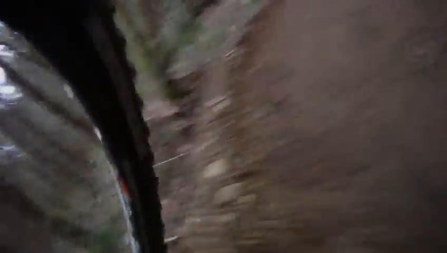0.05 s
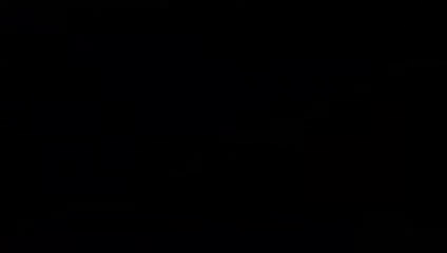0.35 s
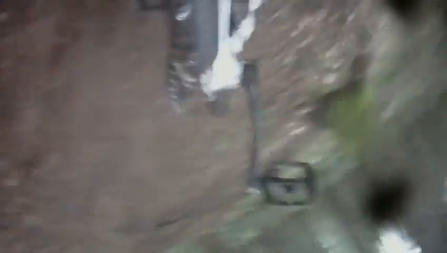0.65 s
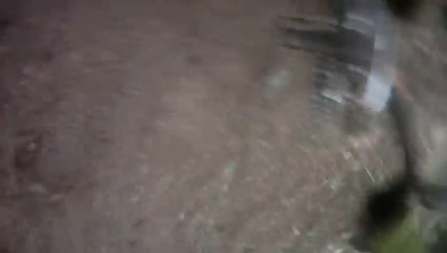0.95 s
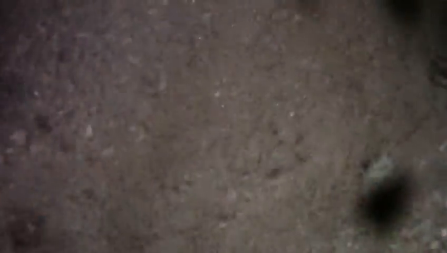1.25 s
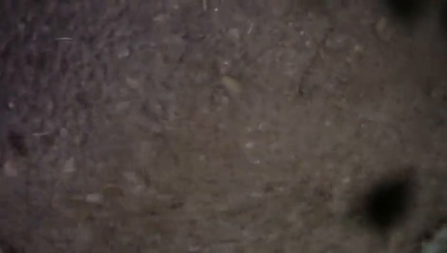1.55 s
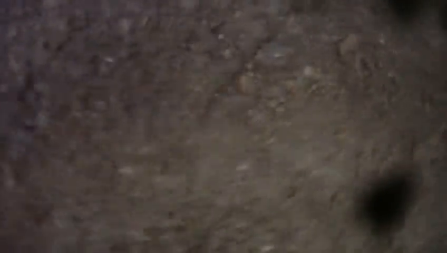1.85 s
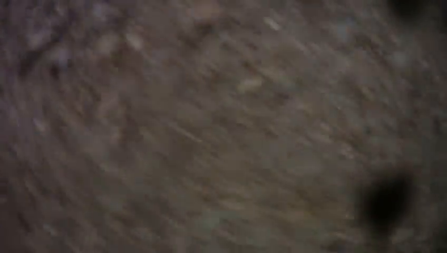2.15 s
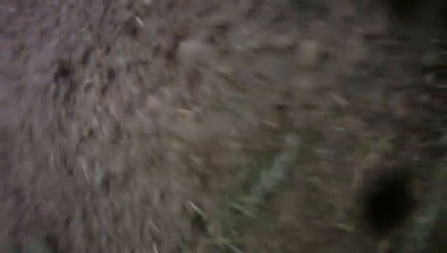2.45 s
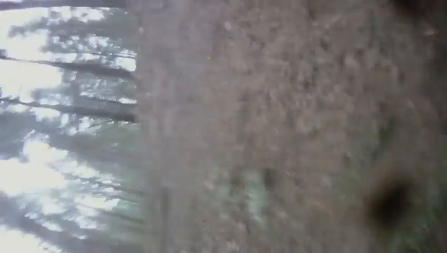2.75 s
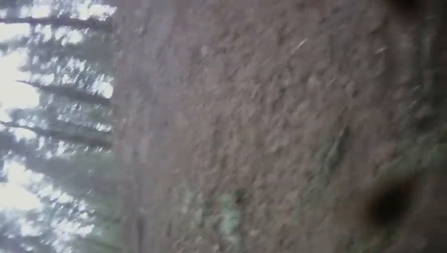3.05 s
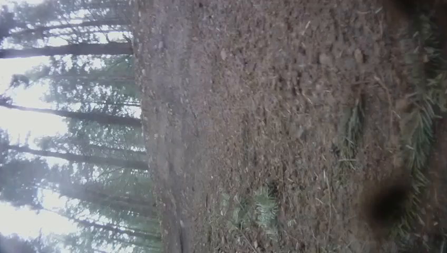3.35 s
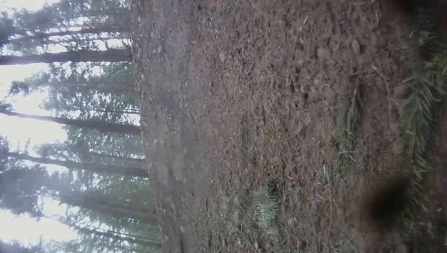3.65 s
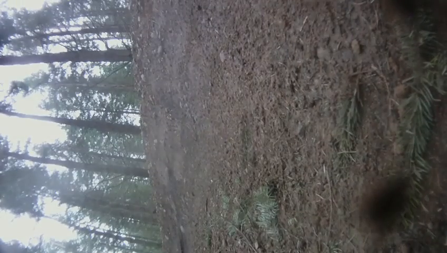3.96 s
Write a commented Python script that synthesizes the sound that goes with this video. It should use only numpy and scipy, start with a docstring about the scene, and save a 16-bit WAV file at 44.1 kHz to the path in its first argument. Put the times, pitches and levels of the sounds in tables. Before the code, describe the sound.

A bike crash, heard from a cased camera worn by the rider: hard, overloading cracks against the ground, then choppy scraping along the forest trail with stone snaps, plastic knocks and a hollow, juddering rumble that settles into faint hiss.

```python
"""Mountain bike crash on a forest trail

Heard from the microphone of a cased camera worn by the rider, with every source right at the case.
The camera hits the ground in a burst of overloading blows, then is dragged over dirt and grit.
Its case clacks, its mount booms and judders, and the jolts choke the microphone.
When all comes to rest, a faint hum of the shell and the camera's own hiss and buzz remain."""
import sys
import numpy as np
from scipy import signal
from scipy.io import wavfile
from scipy.ndimage import uniform_filter1d

SR = 44100
rng = np.random.default_rng(int(sys.argv[2]) if len(sys.argv) > 2 else 0)


def digitize_waveform(pressure):
    """Quantize a signal to 16-bit integers and store it at the path in sys.argv[1].

    Rows of a 2-D input are taken as channels; values are limited to [-1, 1].
    """
    field = np.atleast_2d(pressure).T
    bounded = np.clip(field, -1, 1)
    quanta = np.round(bounded * 32767).astype(np.int16)
    wavfile.write(sys.argv[1], SR, quanta)


N = 176400
T = np.arange(N) / SR


def amp(db):
    """Decibels to gain."""
    return 10 ** (np.asarray(db) / 20)


def unit(x):
    """Scales to an rms of one."""
    return x / np.sqrt(np.mean(x ** 2) + 1e-20)


def level(points):
    """Gain over time from rows of time_s, level_db."""
    return amp(np.interp(T, *np.transpose(points)))


def add(mix, start_s, sound):
    """Mixes a sound in at a given time."""
    part = mix[max(round(start_s * SR), 0):][:len(sound)]
    part += sound[:len(part)]


def colour(x, spectrum):
    """Causal filter of unit energy from rows of freq_hz, gain_db."""
    size = 16384
    hz, db = np.transpose(spectrum)
    log_hz = np.log(abs(np.fft.fftfreq(size, 1 / SR)) + 1)
    log_gain = np.log(amp(np.interp(log_hz, np.log(hz), db)))
    minimum_phase = np.exp(np.conj(signal.hilbert(log_gain)))
    taps = np.fft.ifft(minimum_phase).real[:size // 2]
    return signal.fftconvolve(x, taps / np.linalg.norm(taps))[:len(x)]


# the camera's noise floor: freq_hz, gain_db
HISS_SPECTRUM = [(30, 4), (500, 7.5), (1000, 5.5), (4000, 3), (10000, 0.5), (15000, -2), (16000, -22.5)]
# its electric buzz: freq_hz, gain_db
BUZZ_SPECTRUM = [(3000, -22.5), (4900, -20.5), (5400, -7), (6200, -19), (7500, -20.5), (8100, -13),
                 (8800, -20.5), (9700, -8), (10200, -17.5), (11300, -2.5), (11800, -1), (12300, -8),
                 (15000, -10.5), (15800, -39.5)]

def electronics(buzz_hz=134, pulse_s=.0025, every_s=.15, burst_s=.118):
    """Steady hiss and thin bursts of buzz inside the camera, heard once it lies still."""
    gate = (T - 3.665) % every_s < burst_s
    pulses = np.exp(-(T % (1 / buzz_hz)) / pulse_s) * gate
    hiss = amp(-74.5) * colour(rng.standard_normal(N), HISS_SPECTRUM)
    buzz = amp(-69) * unit(colour(pulses * rng.standard_normal(N), BUZZ_SPECTRUM))
    return hiss + buzz


# modes of the hollow shell that carries the mount: pitch_hz, level_db, t60_s
SHELL_MODES = [(74, -11, .6), (118.2, -20, .4), (244, -4.5, 0.79), (287, -9.5, .35), (363, -12.5, .35),
               (434, -11.5, .7), (555, -10.5, .8), (584, -9.5, .6), (650, -23, .5)]

def shell(body):
    """The shell rings on after whatever shakes it; a faint tremor keeps it humming at rest."""
    t = np.arange(SR) / SR
    tremor = amp(-20.5) * rng.standard_normal(N)
    ring = sum(amp(db - 60 * t / t60) * np.cos(2 * np.pi * hz * t) * 2 * np.log(1000) / (t60 * SR)
               for hz, db, t60 in SHELL_MODES)
    return amp(-8) * signal.fftconvolve(body + tremor, ring)[:N]


def drone(spectrum, steady_s):
    """A resonance rubbed at random, its slow swells evened out."""
    x = colour(rng.standard_normal(N + SR), spectrum)[SR:]
    power = abs(uniform_filter1d(x ** 2, int(steady_s * SR)))
    return x / np.sqrt(power + 1e-9)


# the course of each rumble: time_s, level_db
SWAY_LEVELS = [(0.0, -36), (0.09, -47), (1.1, -37.5), (1.3, -48), (1.36, -37), (2.28, -62), (2.33, -41.5),
               (3.34, -39), (4.0, -74.5)]  # buffeting of the moving camera
JUDDER_LEVELS = [(0.0, -37), (0.07, -28), (0.52, -36.5), (0.54, -27), (1.09, -32.5), (1.28, -29),
                 (1.57, -38.5), (1.59, -31), (2.05, -29), (2.08, -36), (2.22, -29), (2.87, -29),
                 (2.93, -35.5), (3.13, -36), (3.16, -25.5), (3.19, -31.5), (3.54, -34.5), (4.0, -78.5)]  # the mount shaking
BOOM_LEVELS = [(0.0, -48), (0.05, -32), (0.21, -40.5), (0.51, -29.5), (0.54, -34.5), (0.83, -26),
               (0.87, -35), (1.24, -34.5), (1.28, -39.5), (2.1, -38.5), (2.16, -31), (2.51, -30),
               (2.54, -60), (2.58, -31.5), (2.75, -41), (2.84, -25.5), (2.9, -39.5), (3.12, -46.5),
               (3.15, -34.5), (3.35, -36), (3.42, -32.5), (3.64, -34), (3.8, -65), (4.0, -82.5)]  # the shell being rubbed
HOLLOW_LEVELS = [(0.0, -39), (0.04, -28), (0.31, -32), (0.32, -26), (1.47, -39), (1.96, -40), (2.1, -46.5),
                 (2.15, -32), (2.44, -39), (2.52, -42.5), (2.85, -31.5), (2.94, -41), (3.13, -45),
                 (3.15, -29), (3.19, -40), (3.63, -41), (3.78, -65), (4.0, -68.5)]  # hollow rubbing above the boom
# the tone of each rumble: freq_hz, gain_db
SWAY_SPECTRUM = [(5, -25), (20, -30.5), (31, 8.5), (48, -5), (90, -32), (400, -79)]
JUDDER_SPECTRUM = [(20, -39.5), (52, -26.5), (75, 4.5), (110, -2), (140, -8), (175, -6.5), (230, -21),
                   (400, -48.5), (1000, -77.5)]
BOOM_SPECTRUM = [(80, -48.5), (190, -16), (232, -6), (246, 0.5), (256, -4), (266, 2), (280, -2), (300, -10),
                 (450, -34), (1200, -78.5)]
HOLLOW_SPECTRUM = [(150, -37.5), (330, -2.5), (440, 1.5), (510, -4.5), (590, -2), (670, -17), (850, -18.5),
                   (1100, -26.5), (1500, -34), (4000, -66.5)]

def shaking():
    """Four rumbles that reach the microphone through the mount."""
    sway = amp(2) * level(SWAY_LEVELS) * drone(SWAY_SPECTRUM, steady_s=.22)
    judder = amp(.5) * level(JUDDER_LEVELS) * drone(JUDDER_SPECTRUM, steady_s=.11)
    boom = level(BOOM_LEVELS) * drone(BOOM_SPECTRUM, steady_s=.12)
    hollow = amp(-4.5) * level(HOLLOW_LEVELS) * drone(HOLLOW_SPECTRUM, steady_s=.15)
    return sway + judder + boom + hollow


# spells of chatter in the mount: start_s, end_s, pitch_hz, level_db
MOUNT_CHATTER = [(1.49, 1.555, 268, -36), (1.698, 1.738, 172, -23), (1.754, 2.07, 77.1, -26),
                 (2.141, 2.199, 278, -25.5), (2.227, 2.335, 258, -21.5), (2.41, 2.517, 277, -27.5),
                 (3.4, 3.666, 250, -35)]

def chatter(waver_depth=.022, fade_s=.0089):
    """The mount sticks and slips at one of its own pitches, wavering a little."""
    out = np.zeros(N)
    for start, end, hz, db in MOUNT_CHATTER:
        waver = unit(uniform_filter1d(rng.standard_normal(N), SR // 25))
        pitch_hz = hz * (1 + waver_depth * waver)
        swell = np.clip(np.minimum(T - start, end - T) / fade_s, 0, 1)
        out += amp(db) * swell * np.sin(2 * np.pi * np.cumsum(pitch_hz) / SR)
    return out


# modes of the mount and its shell: pitch_hz, level_db, t60_s
MOUNT_MODES = [(78, -13, 0.18), (113, -11, 0.26), (172, -4, 0.058), (250.6, -5, 0.14), (290, -8.5, 0.13),
               (343, -12.5, 0.21), (415, -8, 0.11), (528, -8, 0.11), (809, -9, 0.038)]
# body and mount bumping the ground: start_s, level_db
GROUND_BUMPS = [(0.052, -19.5), (0.391, -13), (0.486, -12.5), (.805, -20), (.939, -21), (1.105, -17.5),
                (1.496, -24.5), (1.547, -27), (1.605, -27), (1.707, -24), (2.149, -23), (2.229, -16),
                (2.317, -28), (2.361, -14.5), (2.413, -20), (2.487, -24), (2.841, -17), (3.156, -17.5),
                (3.425, -27.5)]

def bumps():
    """Soft knocks ring the low modes of the mount, just behind the microphone."""
    out, t = np.zeros(N), np.arange(SR // 3) / SR
    for start, db in GROUND_BUMPS:
        for k, (hz, mode_db, t60) in enumerate(MOUNT_MODES):
            tone = (-1) ** k * np.sin(2 * np.pi * hz * rng.uniform(.94, 1.04) * t)
            add(out, start, amp(db + mode_db - 60 * t / t60) * tone)
    return out


# slides along the trail: start_s, end_s, first_db, last_db
DIRT_SLIDES = [(0, 0.057, -26.5, -48), (0.041, 0.152, -29, -34.5), (0.23, 0.33, -74, -36),
               (.379, .48, -27.5, -34), (0.47, 0.694, -33, -30), (0.701, 0.818, -31, -34.5),
               (0.83, 1.178, -38, -37), (1.251, 1.318, -36, -37.5), (1.341, 1.368, -38, -40),
               (1.399, 1.505, -33.5, -43), (1.599, 1.726, -34.5, -47.5), (1.733, 2.067, -33.5, -35),
               (2.226, 2.338, -35, -34.5), (2.35, 2.402, -37, -29.5), (2.408, 2.539, -35, -41),
               (2.564, 2.802, -37, -37), (2.807, 2.935, -31.5, -38), (3.019, 3.129, -60, -49),
               (3.151, 3.309, -35.5, -35), (3.294, 3.439, -42, -42)]

def pressure(patch_s=.018, patchy_db=2.5, edge_s=.0025):
    """How hard the case is pressed down; uneven ground makes it come and go."""
    slides = np.zeros(N)
    for start, end, first_db, last_db in DIRT_SLIDES:
        ramp = amp(np.interp(T, [start, end], [first_db, last_db]))
        slides = np.maximum(slides, ramp * (T >= start) * (T < end))
    ground = unit(uniform_filter1d(rng.standard_normal(N), int(patch_s * SR)))
    patches = amp(patchy_db * (np.minimum(ground, 1) - .35))
    return abs(uniform_filter1d(slides, int(edge_s * SR))) * patches


def choking(pressed, max_per_s=42, choke_s=.0026, depth_db=-50, edge_hz=3500):
    """While the case slides, jolts block the microphone for a few milliseconds at a time."""
    blocked = np.zeros(N)
    chance = max_per_s / SR * np.minimum(pressed / amp(-38), 1)
    starts = np.flatnonzero(rng.random(N) < chance)
    for at, length_s in zip(starts, choke_s * rng.uniform(.4, 1.5, len(starts))):
        blocked[at:at + int(length_s * SR)] = 1
    pole = np.exp(-2 * np.pi * edge_hz / SR)
    return 1 - (1 - amp(depth_db)) * signal.lfilter([1 - pole], [1, -pole], blocked)


def grit(spectrum, per_s, spread_db, rub, grain_s):
    """Grains of many sizes snap against the case over a thin rubbing noise."""
    strikes = rng.random(N) < per_s / SR
    sizes = amp(spread_db * np.minimum(rng.exponential(1, N), 3))
    power = signal.lfilter([1], [1, -np.exp(-2 / (grain_s * SR))], strikes * sizes ** 2)
    power = power / power.mean() + rub
    power /= uniform_filter1d(power, SR // 8)  # evens out slow swells
    return colour(np.sqrt(power) * rng.standard_normal(N), spectrum)


# dirt and sand against the case: freq_hz, gain_db
DIRT_SPECTRUM = [(150, -28), (400, 5.5), (850, 6.5), (1200, -1), (1700, 1.5), (2100, -3.5), (2900, -2),
                 (3700, -11), (5500, -18), (8000, -25), (14500, -34.5), (16500, -46)]
SAND_SPECTRUM = [(300, -8), (1000, -2), (3000, -0.5), (4500, -1), (8000, -5), (12000, -9.5), (15000, -10.5),
                 (16300, -24)]
# loose grit: time_s, level_db
LOOSE_LEVELS = [(0, -84), (.3, -35), (.44, -26.5), (.9, -45), (1.2, -45), (1.57, -56), (2.1, -53),
                (2.17, -44), (2.9, -48.5), (3.05, -53.5), (3.6, -48.5), (3.66, -59.5), (3.72, -80),
                (4, -94.5)]

def scraping(pressed):
    """Dirt crunches and sand sizzles right at the microphone; loose grit ticks between slides."""
    dirt = pressed * grit(DIRT_SPECTRUM, per_s=330, spread_db=4, rub=.26, grain_s=.00081)
    sizzle = amp(-48.5) * (pressed / amp(-37)) ** .93  # follows the pressure a little less than dirt
    sand = sizzle * grit(SAND_SPECTRUM, per_s=230, spread_db=-.5, rub=.02, grain_s=.00022)
    loose = level(LOOSE_LEVELS) * grit(DIRT_SPECTRUM, per_s=80, spread_db=4.5, rub=.066, grain_s=.0025)
    return dirt + sand + loose


def bursts(rows, spectrum):
    """Short dying bursts of noise from rows of start_s, level_db, decay_s."""
    out, t = np.zeros(N), np.arange(SR // 25) / SR
    for start, db, decay_s in rows:
        add(out, start, amp(db) * np.exp(-t / decay_s) * rng.standard_normal(len(t)))
    return colour(out, spectrum)


# stone strikes: start_s, level_db
STONE_SNAPS = [(0.0602, -28), (0.088, -30), (0.093, -33), (0.259, -27), (0.278, -26.5), (.6328, -40),
               (.696, -16), (.7335, -26.5), (1.341, -17.5), (1.416, -22), (1.518, -29), (1.551, -23),
               (1.606, -22), (1.711, -20.5), (2.076, -27), (2.131, -27.5), (2.155, -30.5), (2.228, -43),
               (2.841, -24.5), (3.02, -27.5), (3.056, -19.5), (3.081, -29), (3.1, -29), (3.118, -24),
               (3.156, -21), (3.344, -20.5)]
# their bright tone: freq_hz, gain_db
SNAP_SPECTRUM = [(300, -1), (1000, 1.5), (3000, 5.5), (4500, 0), (8000, -7), (12000, -12.5), (15000, -12),
                 (16500, -27)]

def stones(decay_s=.0013):
    """Single stones snap against the case."""
    return amp(-7) * bursts([(start, db, decay_s) for start, db in STONE_SNAPS], SNAP_SPECTRUM)


# struck plastic, in clacks and blows alike: freq_hz, gain_db
CRACK_SPECTRUM = [(60, 2.5), (400, -1.5), (1000, 3), (1800, 3), (2900, 6), (3600, -1.5), (4400, -4.5),
                  (5500, -6.5), (8000, -15), (12000, -22), (16500, -29)]
# modes of the case: pitch_ratio, level_db, t60_s
CASE_MODES = [(.33, -14, 0.01), (.44, -15, 0.013), (.62, -16.5, 0.015), (.87, -9, 0.013), (1, -4.5, 0.011),
              (1.08, -16, .018), (1.45, -15.5, 0.0054)]
# knocks on the case: start_s, level_db, pitch_hz
CASE_CLACKS = [(.034, -18, 3220), (.146, -7, 2980), (.1965, -20, 2840), (0.3599, 20.5, 3095),
               (0.516, -13, 2700), (0.58, -9, 2640), (0.733, -12.5, 2900), (0.981, -21, 2470),
               (1.0443, -18, 2420), (1.108, -19.5, 2962), (1.16, -11.5, 2520), (1.2183, -11, 2730),
               (1.341, -25, 3000), (1.351, -18, 2820), (1.481, -23, 2730), (1.517, -17.5, 2850),
               (1.5565, -19, 2800), (1.6043, -19.5, 2680), (1.713, -23.5, 3000), (1.75, -17.5, 2740),
               (1.923, -17, 2900), (2.2631, -12.5, 2855), (2.3812, -12, 2740), (2.8166, -6, 2760),
               (2.949, -25, 2745), (3.057, -25, 3000), (3.1176, -27, 2820), (3.1385, -26, 3050),
               (3.327, -14.5, 2800), (3.353, -16, 2880), (3.4588, -18, 2897), (3.479, -39, 2800),
               (3.525, -43, 2770), (3.5614, -29.5, 2850), (3.607, -36, 2780), (3.64, -32, 2880)]

def clacks(tick_s=.00089, attack_s=.0003):
    """A tick, then the brief ring of the plastic case around the microphone."""
    out, t = np.zeros(N), np.arange(SR // 20) / SR
    attack = 1 - np.exp(-t / attack_s)
    for start, db, hz in CASE_CLACKS:
        ring = np.zeros(len(t))
        for ratio, mode_db, t60 in CASE_MODES:
            cycles = hz * ratio * rng.uniform(.91, 1.03) * t + rng.random()
            ring += amp(mode_db - 60 * t / t60) * np.sin(2 * np.pi * cycles)
        tick = amp(-10) * np.exp(-t / tick_s) * rng.standard_normal(len(t))
        add(out, start, amp(db) * (ring * attack + colour(tick, CRACK_SPECTRUM)))
    return out


# the camera hitting the trail: start_s, level_db, decay_s
CRASH_BLOWS = [(.3272, -5, 0.00084), (0.3284, 24.5, .0007), (.3305, 13, .0009), (0.3322, -10, .0007),
               (0.334, -10, .0005), (0.3358, 22, .0005), (0.3384, 1, .0003), (0.3395, -6, .001),
               (.345, -1.5, .001), (0.379, -8.5, 0.0032), (0.385, -8, .004), (.392, 0, .0012),
               (.396, 4, .0005), (0.4, 0.5, .0016), (0.4121, -13, 0.0028), (0.416, -7, 0.004),
               (.4214, 1, .0018), (0.4239, -7, 0.0027), (.484, -10.5, .0018), (0.4904, -14, .003),
               (0.538, -14, 0.0025), (0.6141, -12.5, 0.0011), (0.632, -24, .003), (0.6473, -8.5, 0.0017),
               (0.6642, -16.5, 0.0055), (2.36, -19, 0.0018), (2.391, -24, .002), (2.8446, -18.5, 0.0022),
               (2.87, -23, 0.0062), (3.162, -19, 0.0036)]

def blows():
    """Heavy blows of plastic on stony ground, at point-blank range."""
    return amp(-3.5) * bursts(CRASH_BLOWS, CRACK_SPECTRUM)


# faint stereo noise that swells with the crackle: freq_hz, gain_db
FIZZ_SPECTRUM = [(200, -25), (600, -2), (1000, 0), (2200, -5), (4000, -3), (7000, -8), (14000, -13),
                 (16500, -24)]

def scene(rest_s=3.77, rest_db_per_s=65, fizz_db=-21):
    """Mixes the crash in the centre, with a faint wide fizz following the scrapes and hits."""
    pressed = pressure()
    scrape = scraping(pressed)
    hits = blows() + stones() + clacks()
    settling = amp(-rest_db_per_s * np.maximum(T - rest_s, 0))
    body = (shaking() + chatter()) * settling + bumps()
    mid = (body + shell(body) + scrape) * choking(pressed) + hits + electronics()
    crackle = scrape + np.clip(hits, -.5, .5)
    envelope = np.sqrt(abs(uniform_filter1d(crackle ** 2, size=64)))
    fizz = amp(fizz_db) * colour(envelope * rng.standard_normal(N), FIZZ_SPECTRUM)
    return np.array([mid + fizz, mid - fizz])


def record(dry, ceiling_db=-1.5, cutoff_hz=16100):
    """The camera clips on the hardest blows, then cuts the highest treble."""
    clipped = np.clip(dry, -amp(ceiling_db), amp(ceiling_db))
    lowpass = signal.firwin(255, cutoff_hz, window=("kaiser", 9), fs=SR)
    return signal.oaconvolve(clipped, lowpass[None], "same")


dry = scene()
out = record(dry)
digitize_waveform(out)
```